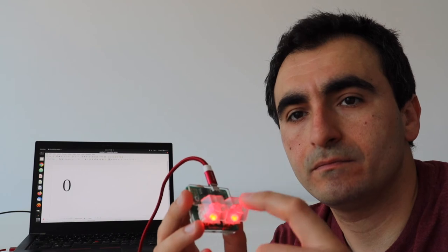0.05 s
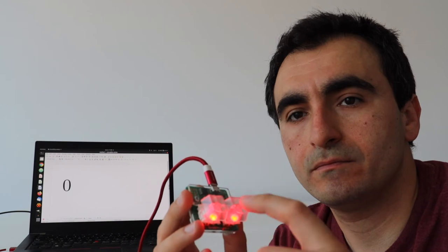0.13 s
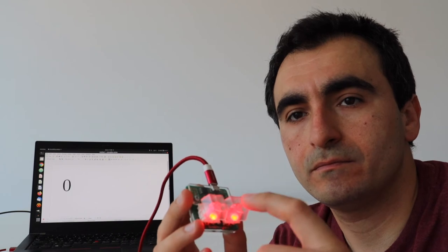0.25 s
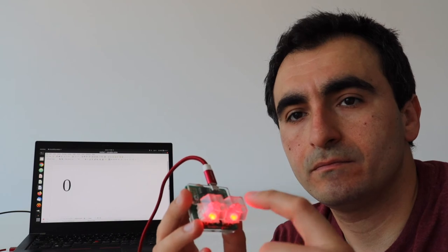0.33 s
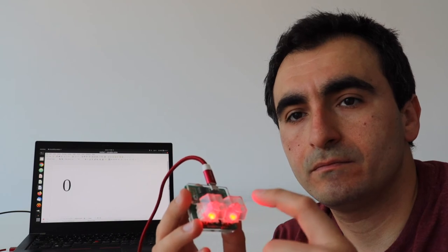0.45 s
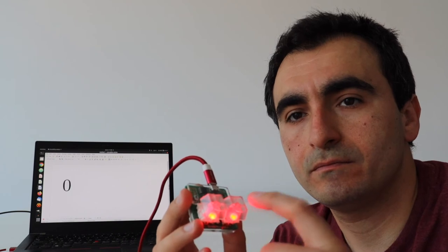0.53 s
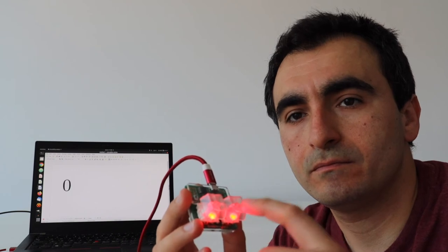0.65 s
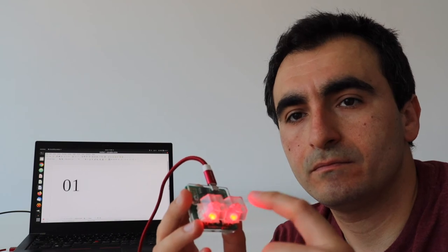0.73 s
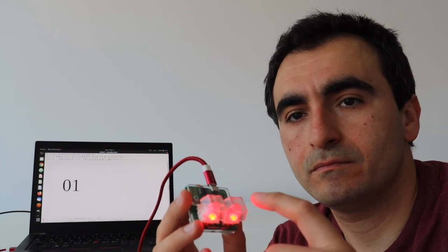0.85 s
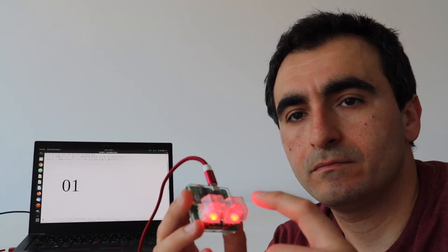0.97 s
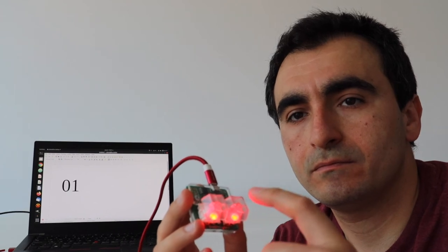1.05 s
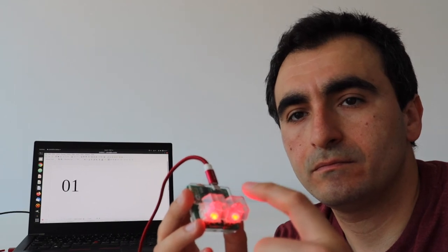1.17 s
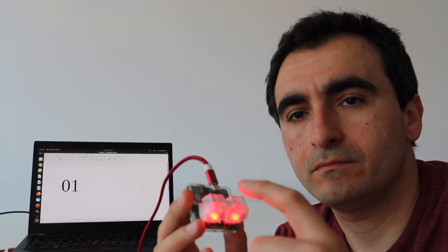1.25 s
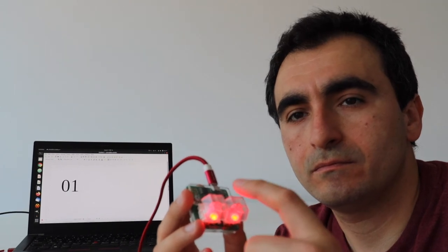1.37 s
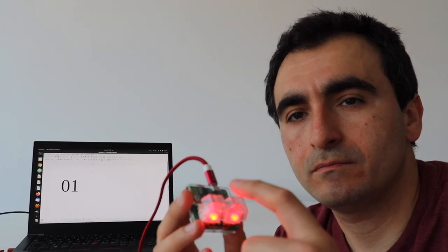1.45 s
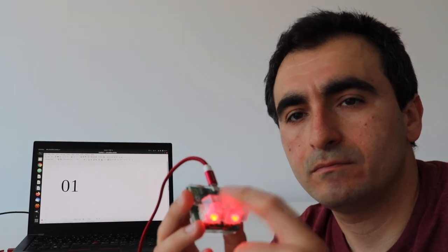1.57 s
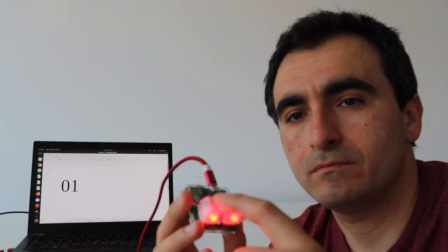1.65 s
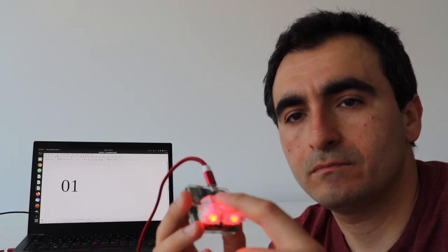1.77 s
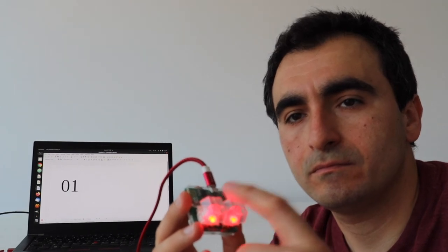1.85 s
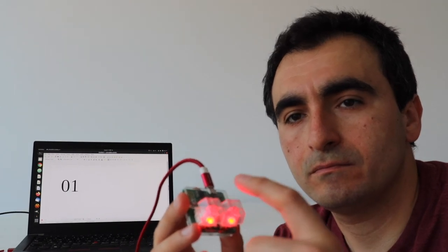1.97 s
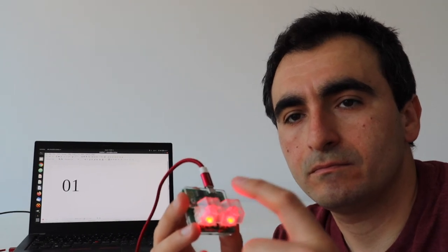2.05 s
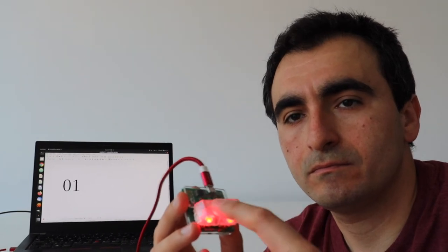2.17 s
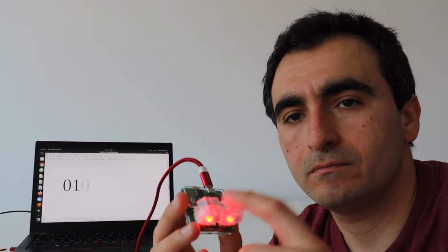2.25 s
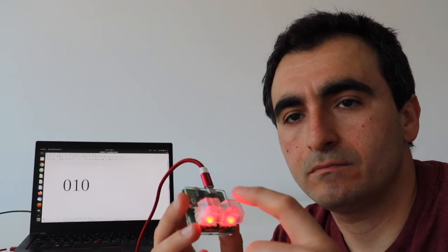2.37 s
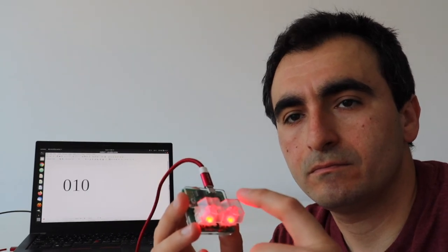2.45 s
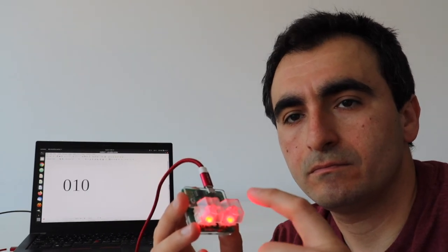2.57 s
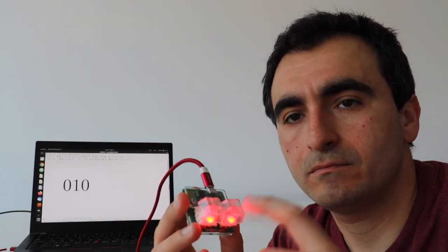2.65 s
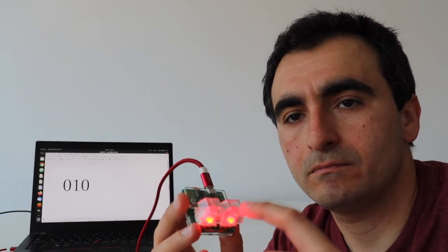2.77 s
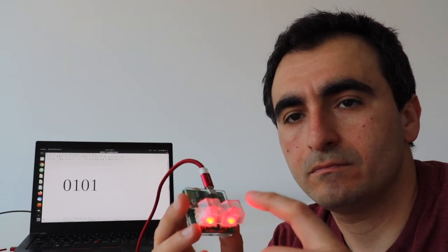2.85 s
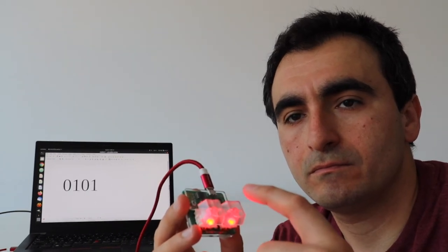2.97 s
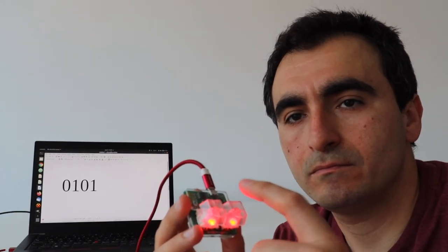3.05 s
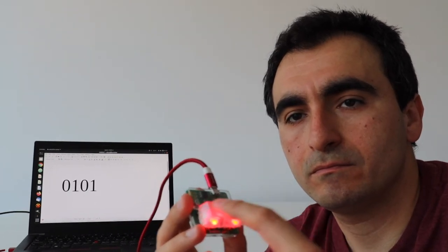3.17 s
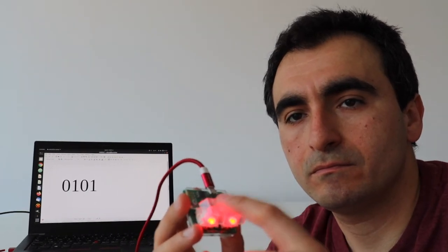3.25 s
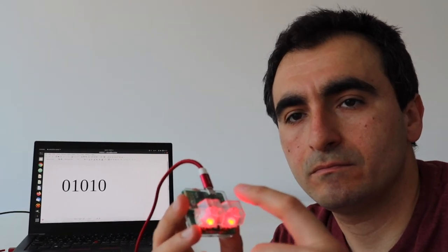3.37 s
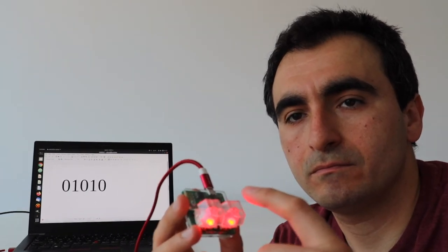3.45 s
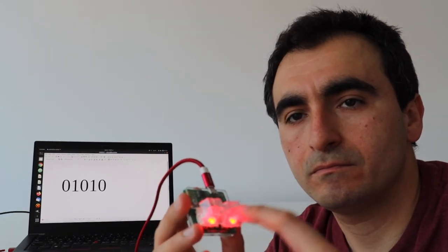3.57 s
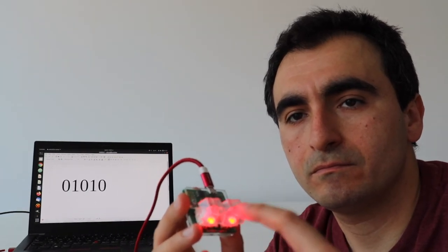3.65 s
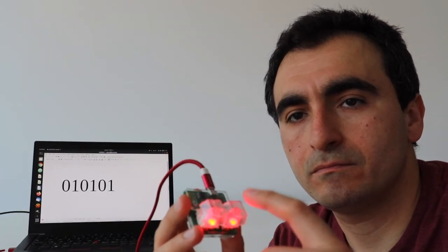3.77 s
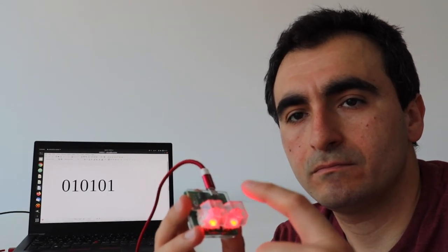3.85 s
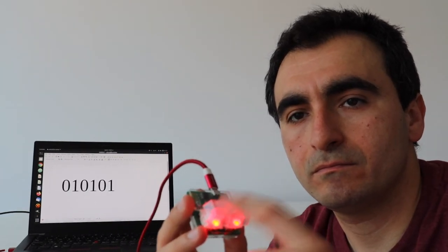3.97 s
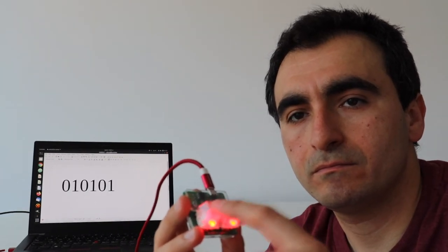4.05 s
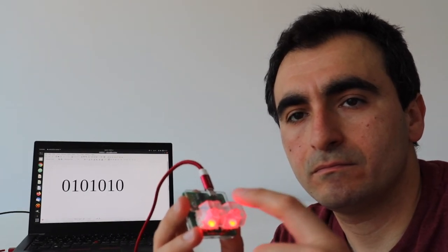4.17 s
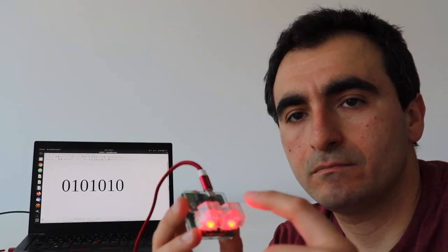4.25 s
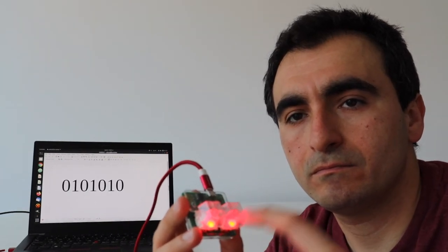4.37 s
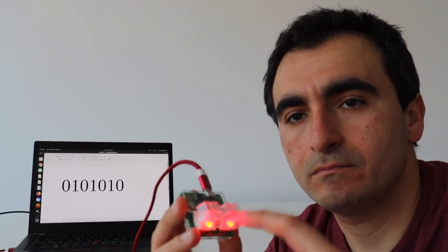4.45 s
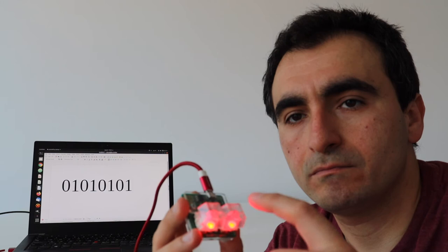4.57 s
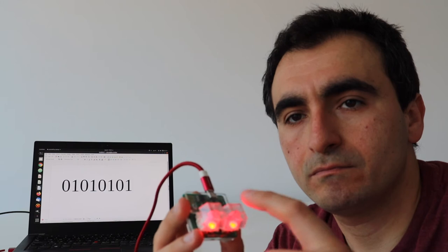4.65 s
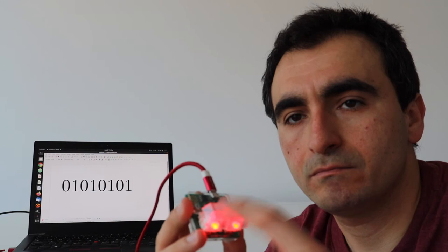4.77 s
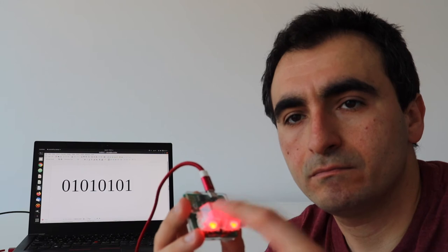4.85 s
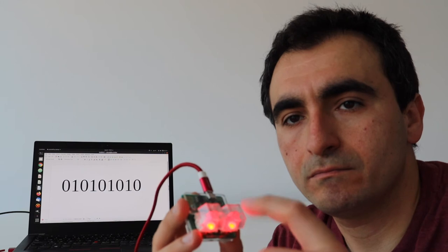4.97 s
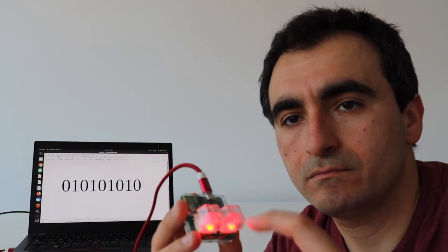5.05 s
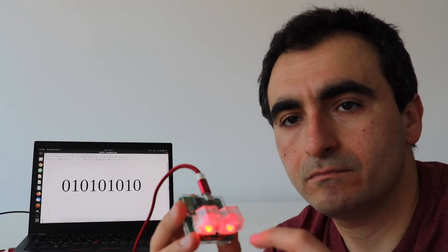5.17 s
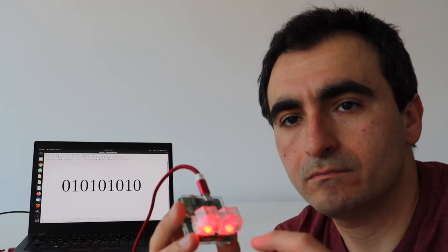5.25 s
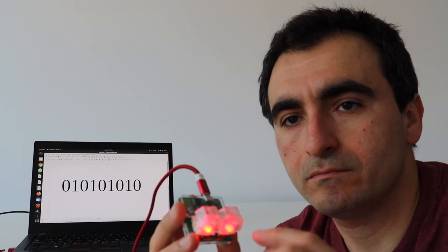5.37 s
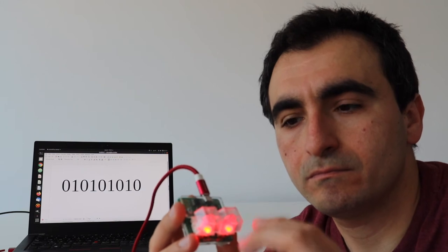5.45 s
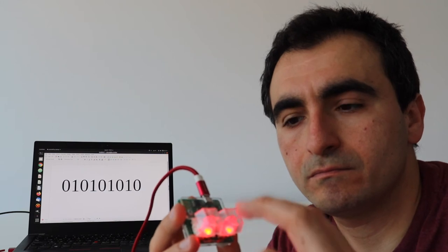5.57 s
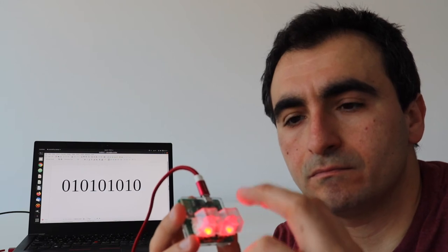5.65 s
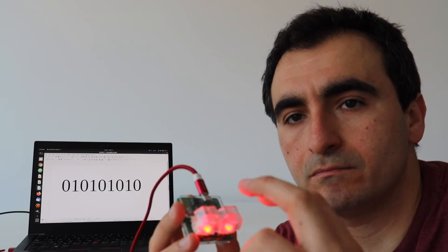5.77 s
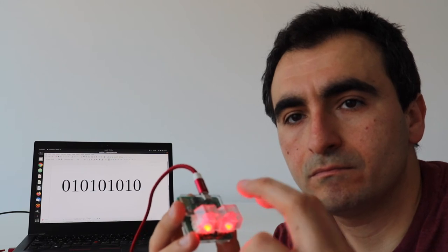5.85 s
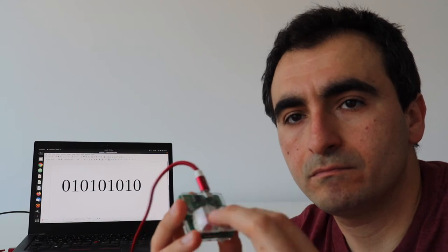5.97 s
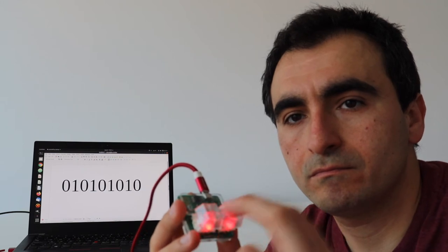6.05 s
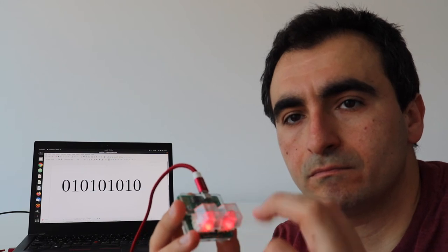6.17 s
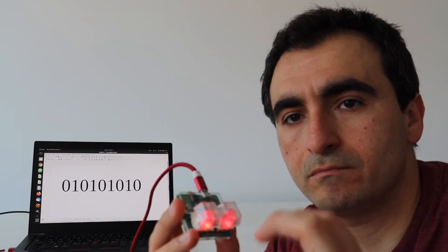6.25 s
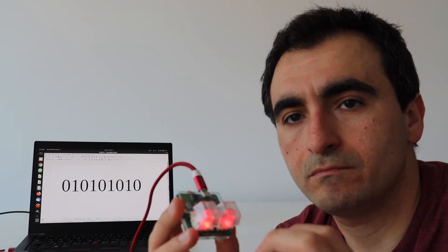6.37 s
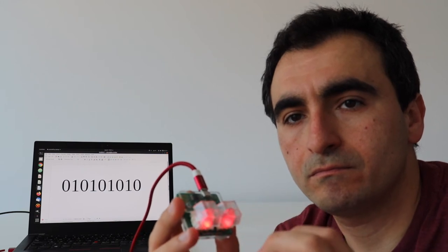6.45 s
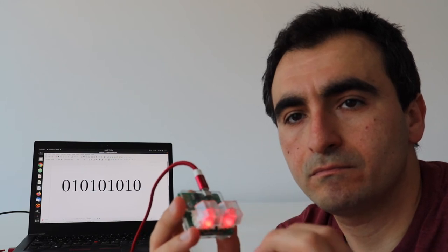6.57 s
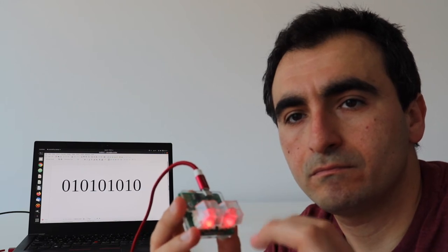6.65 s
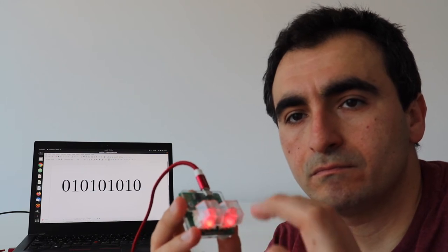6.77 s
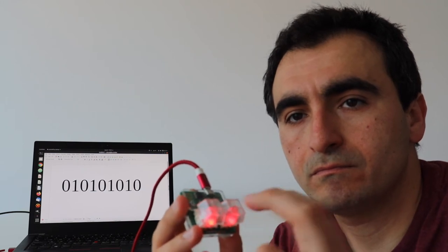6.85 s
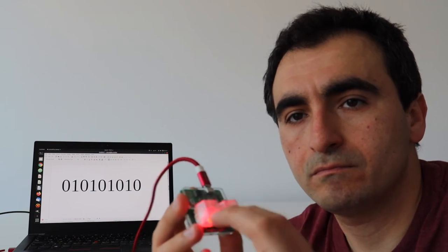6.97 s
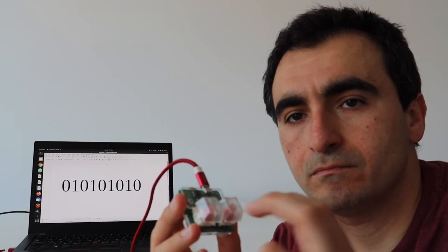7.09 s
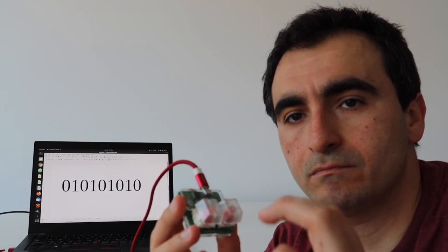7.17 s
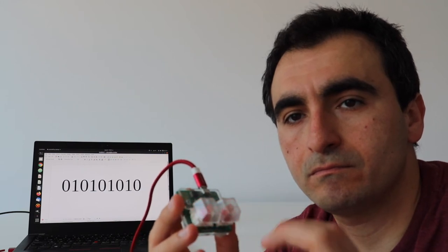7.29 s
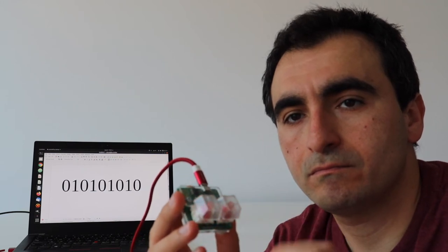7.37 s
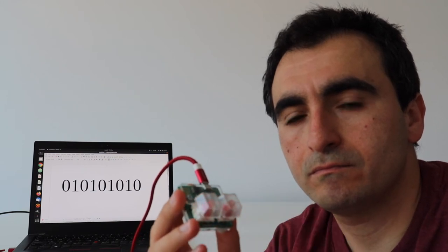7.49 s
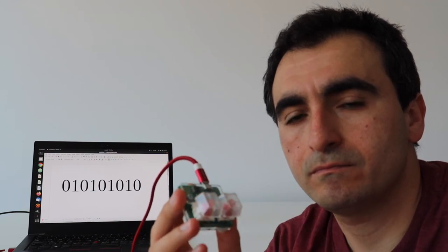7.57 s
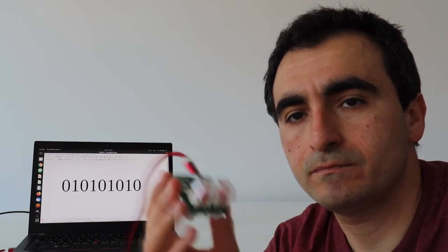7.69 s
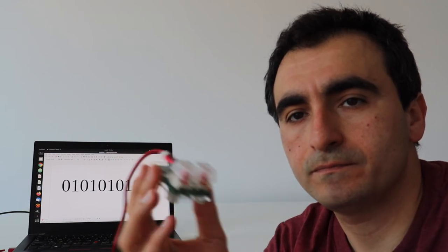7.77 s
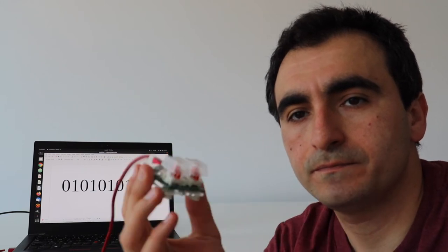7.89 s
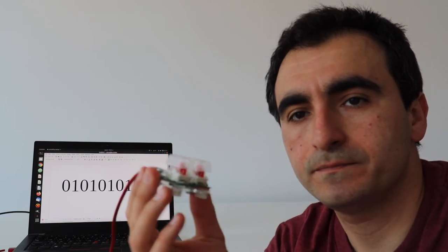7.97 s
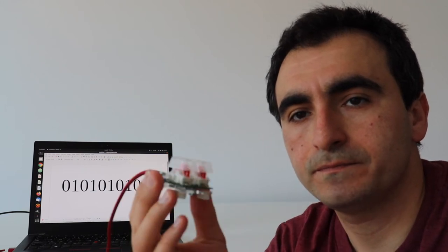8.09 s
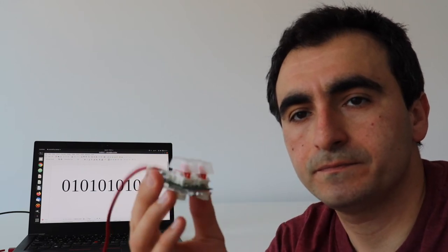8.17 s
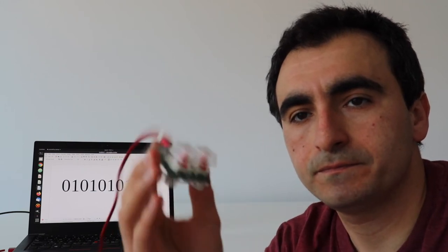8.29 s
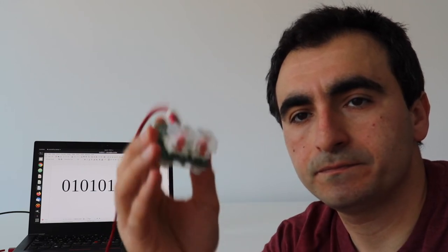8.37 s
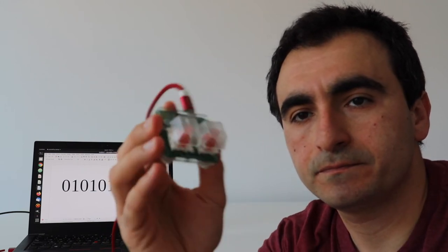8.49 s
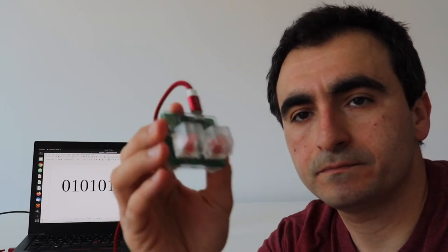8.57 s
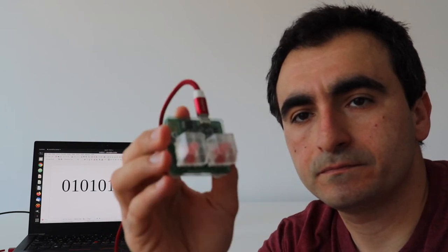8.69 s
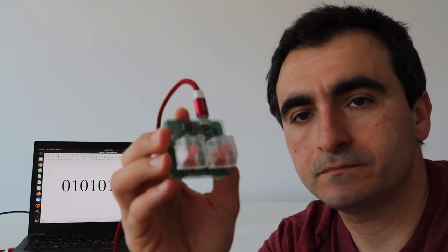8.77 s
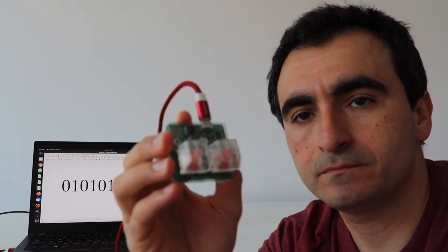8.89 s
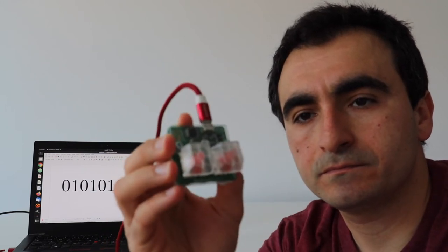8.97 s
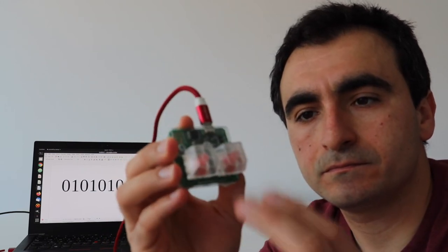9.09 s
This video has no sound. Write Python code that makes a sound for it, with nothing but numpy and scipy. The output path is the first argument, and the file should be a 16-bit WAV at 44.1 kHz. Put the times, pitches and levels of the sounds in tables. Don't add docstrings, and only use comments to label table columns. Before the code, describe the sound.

A finger taps two small mechanical key switches, crisp clacks with a lively room tail, above a faint steady whine and soft hiss.

```python
import sys
import numpy as np
from scipy import signal
from scipy.fft import rfft, irfft
from scipy.io import wavfile

SR = 44100
rng = np.random.default_rng(int(sys.argv[2]) if len(sys.argv) > 2 else 0)


def volts_from_decibels(level):
    exponent = np.asarray(level, float) / 20
    return 10 ** exponent


def store_pcm(level_fs):
    pcm = np.round(np.clip(level_fs, -1, 1) * 32767).astype(np.int16)
    wavfile.write(sys.argv[1], SR, np.atleast_2d(pcm).T)


N = 402633
LEAD = 13230
HZ = np.fft.rfftfreq(2048, 1 / SR)


def keys():
    # start_s, housing_db, board_db, stem_mode_hz, cap_db
    bottom_outs = [(0.669, -9.5, -7.5, 4840, -11), (2.2217, 0.5, -3, 5570, -2.5),
                   (2.7621, -3.5, -5.5, 5130, -10), (3.242, 2.5, -11.5, 4540, -8.5),
                   (3.6562, -2, -4, 5300, -7.5), (4.0636, -2, -4, 5230, -0.5), (4.4643, 0, -7.5, 5220, -8),
                   (4.8674, -5, -4, 5770, -1), (7.0076, 5.5, -10, 4340, -15)]
    # start_s, housing_db, stem_mode_hz, cap_db
    glances = [(4.8684, -19, 5510, 0.5), (6.0224, -2, 4350, -9.5), (6.0261, -3.5, 4330, -6.5),
               (6.0283, -12.5, 5560, 12), (7.0089, -8, 4310, 6), (7.0111, -12.5, 5700, -2.5)]
    # start_s, housing_db, cap_db, board_push_db
    top_outs = [(0.7318, -10, 5, -0.5), (1.7608, -20, 6.5, 0.5), (2.2922, -13.5, 9, 1),
                (2.2936, -14, 10.5, -3), (2.8277, -8.5, 5, 1), (2.8287, -13, -10, -8),
                (3.3132, -10, 4.5, 0.5), (3.3156, -15, 7.5, 0), (3.7296, -6.5, 1.5, -2.5),
                (3.7311, -6, -7, -4), (4.1397, -6.5, 4, -1.5), (4.1412, -36, -2, 3), (4.5362, -4, 3, -3),
                (4.5384, -7, -5.5, -5), (4.9268, -5.5, 7.5, -1.5), (6.0885, -7.5, 6.5, -0.5),
                (6.0899, -17, 9, -0.5), (6.0981, -10, 10.5, 0), (6.0995, -15.5, 10, -3),
                (7.0705, -11.5, 15, 2), (7.0745, -7, 9.5, -1.5)]
    # start_s, housing_db, cap_db
    fidgets = [(0.6463, -25, -9), (1.6653, -32, -6), (1.67, -39.5, 9.5), (2.7515, -25, 0),
               (3.2293, -38.5, 7), (3.2337, -34, 6), (4.1239, -24.5, 9.5), (6.0152, -26, 7),
               (6.0182, -24, 8), (7.6784, -43.5, -2), (7.7457, -36.5, 3), (7.7517, -43, 1),
               (7.8097, -47, -1), (8.2807, -43, 0), (8.2897, -43, 0), (0.6375, -32, -6)]
    # start_s, housing_db, board_db, stem_db, stem_mode_hz, cap_db
    earlier = [(-.19, -9, 3.5, 1.5, 4800, -10), (-.12, -6, -8.5, -1.4, 5500, 4)]
    square_stem_db, askew_stem_db, askew_board_db = 1.7, 10.5, -0.5

    square = [(s, db, board_db, square_stem_db, hz, cap_db)
              for s, db, board_db, hz, cap_db in bottom_outs]
    askew = [(s, db, askew_board_db, askew_stem_db, hz, cap_db) for s, db, hz, cap_db in glances]
    down = knocks(square, rattle_db=-21, rattle_s=.002, tick_db=-2.5, thud_db=-23, free=0.64)
    down += knocks(askew, rattle_db=-17.5, rattle_s=.002, tick_db=-2, thud_db=-16.5, free=0.8)
    up = knocks(loose(top_outs), rattle_db=-15, rattle_s=.0021, tick_db=-14.5, thud_db=-20.5, free=1.0)
    light = landings() + loose(fidgets)
    touch = knocks(light, rattle_db=-11, rattle_s=.0015, tick_db=-5, thud_db=-18.5, free=.9)
    before = knocks(earlier, rattle_db=-42, rattle_s=0.0018, tick_db=-16, thud_db=-18, free=0.55)
    return volts_from_decibels(0.44) * (down + up) + volts_from_decibels(2.0) * touch + before


def loose(rows):
    knock_rows = []
    for s, db, cap_db, *push_db in rows:
        board_db = -3.5 + 0.28 * cap_db + sum(push_db)
        stem_db = -4 + 0.44 * cap_db
        knock_rows.append((s, db, board_db, stem_db, 5720, cap_db))
    return knock_rows


def landings():
    # start_s, housing_db, graze_db, settle_db
    touches = [(0.6419, -26, -22, -16), (2.216, -18, -6, -11), (2.7461, -23, -6, -0.5),
               (3.6407, -26, -4, -1), (4.0548, -19.5, -16, -7), (4.451, -23, -8, -6),
               (4.8558, -21, -16, -4), (7.0008, -19, -7, -5)]
    # board_db, stem_db, stem_mode_hz, cap_db
    graze, contact, settle = [
        (-1, -5.5, 4350, 0.5),
        (7, 5, 12000, 3),
        (1, 4, 5600, 4),
    ]
    graze_s, settle_s = .0026, .0019
    knock_rows = []
    for s, db, graze_db, settle_db in touches:
        knock_rows.append((s - graze_s, db + graze_db, *graze))
        knock_rows.append((s, db, *contact))
        knock_rows.append((s + settle_s, db + settle_db, *settle))
    return knock_rows


def knocks(rows, rattle_db, rattle_s, tick_db, thud_db, free):
    # mode_hz, level_db, t60_s
    housing = [(3150, -8, .008), (3430, -0.5, 0.016), (3790, -5.5, .008)]
    board = [(1750, -13, .014), (2237, -4, 0.012), (2595, 0.5, 0.01), (2930, -2, 0.0046)]
    stem = [(4210, -2.5, .011), (4480, -3, 0.0087), (4800, -3.5, 0.0074), (5170, -5.5, .008),
            (5590, -2, .016), (6170, -9.5, .007)]
    left_cap = [(6800, -12, .007), (7350, -6.5, .011), (7626, -1.5, .02), (8400, -13, .01),
                (9200, -17.5, .007)]
    right_cap = [(6500, -4.5, 0.0063), (7000, -5, 0.0087), (7450, -2.5, .012), (8000, -5, .01),
                 (8600, -1.5, .016)]
    tick = [(9900, -6.5, .004), (11080, -3, .006), (12000, 0, .007), (12700, -0.5, .005),
            (13620, -3.5, .005), (14800, -4, 0.0048), (16000, -9, 0.0033)]
    jolt = [(449, -4.5, .003), (1000, 0, 0.0053), (1280, 1, .006)]
    right_strokes = [.7, 2.79, 3.69, 4.49, 8.28]
    stroke_reach_s = .08

    out = np.zeros(LEAD + N + 2000)
    t = np.arange(260) / SR
    chances = rng.standard_normal((len(rows), 320))
    for (s, db, board_db, stem_db, stem_hz, cap_db), luck in zip(rows, chances):
        blow = volts_from_decibels(rattle_db) * luck[60:] * np.exp(-(t / rattle_s) ** 2)
        blow[0] = -1
        is_right = min(abs(s - np.array(right_strokes))) < stroke_reach_s
        cap = right_cap if is_right else left_cap
        power = ring(housing, 0, luck, free)
        power += ring(board, board_db, luck[10:], free)
        power += ring(stem + [(stem_hz, 3, .015)], stem_db, luck[20:], free)
        power += ring(cap, cap_db, luck[30:], free)
        power += ring(tick, cap_db + tick_db, luck[40:], free)
        power += ring(jolt, thud_db, luck[50:], 0.89)
        power_heard = power / (abs(rfft(blow, 2048)) + .2) ** 1.3
        sound = np.convolve(blow, causal(power_heard))
        at = LEAD + round(s * SR) + 6
        out[at:at + len(sound)] += volts_from_decibels(db) * np.sqrt(power.sum()) * sound / np.linalg.norm(sound)
    return out


def ring(modes, db, luck, free):
    hz, mode_db, t60 = np.transpose(modes)[:, :, None]
    luck = luck[:len(modes), None]
    load = volts_from_decibels(mode_db + 2.5 * luck)
    detuned_hz = hz * (1 + .008 * luck[::-1])
    off = (HZ - detuned_hz) * free * t60 / 1.1
    power = (load ** 2 / (1 + off ** 2)).sum(0)
    power /= 1 + (.9 * hz.min() / (HZ + 1)) ** 10 + (HZ / (1.08 * hz.max())) ** 14
    return volts_from_decibels(db) ** 2 * power / power.sum()


def causal(power):
    cepstrum = irfft(.5 * np.log(power + 1e-12 * power.max()))
    cepstrum[1:1024] *= 2
    cepstrum[1025:] = 0
    return irfft(np.exp(rfft(cepstrum)))[:1200]


def room(x):
    # delay_s, level_db
    echoes = [(.004, -20), (.008, -25), (.0217, -27), (.0257, -27), (.0282, -28), (.0322, -29)]
    # time_s, level_db
    facing = [(.7, 0), (1.7, 2), (2.25, 1.4), (2.799, -0.5), (3.28, 2), (3.7, -0.5), (4.1, 0.9),
              (4.5, -0.1), (4.9, 0.8), (6.05, 1.45), (7.04, 1)]
    # band_hz, t60_s
    tail_t60 = [(1000, .9), (2600, 1.2), (5000, 1.12), (7600, 1.0), (10000, .8), (12500, .65), (16000, .5)]
    # band_hz, level_db
    tail_energy = [(1000, -9.5), (1800, -7), (2500, -10.5), (3500, -10.5), (5000, -11), (7600, -14),
                   (10000, -12.5), (13000, -19.5), (16000, -16)]

    out = x.copy()
    t_out = np.arange(len(x)) / SR
    outward = x * volts_from_decibels(np.interp((np.arange(len(x)) - LEAD) / SR, *np.transpose(facing)))
    for s, db in echoes:
        delay = round(s * SR)
        out[delay:] += volts_from_decibels(db) * x[:-delay]
    for k in range(3):
        hz, t, z = signal.stft(rng.standard_normal(int(1.5 * SR)), SR, nperseg=256)
        onset = np.clip((t - .006) / 0.0062, 0, 1)
        decay = volts_from_decibels(-60 * t / read(tail_t60, hz)[:, None]) * onset
        decay *= volts_from_decibels(read(tail_energy, hz))[:, None] / np.sqrt((decay ** 2).sum(1, keepdims=True) * 128)
        tail = signal.istft(z * decay, SR, nperseg=256)[1]
        share = np.sqrt(2 / 3) * np.cos(np.pi * (t_out * 160 + k / 3))
        out += signal.fftconvolve(outward * share, tail)[:len(x)]
    return out[LEAD:LEAD + N]


def fan():
    # time_s, pitch_hz, level_db
    whine = [(0.0, 887.6, -61), (1.4, 889.5, -60), (1.63, 889.6, -57.5), (3.99, 889.1, -58.5),
             (4.65, 889.4, -63), (5.92, 890.6, -55), (6.18, 889.7, -66), (6.31, 889.0, -55.5),
             (6.79, 888.3, -64), (8.11, 886.9, -60), (8.14, 888.1, -69.5), (9.13, 886.5, -63.5)]
    # pitch_hz, width_hz, level_db
    hum_modes = [(178, 14, -75), (781, 8, -72.5), (843, 12, -70), (912.7, 8, -71), (960, 14, -78)]
    pitch = curve(whine, 1)
    line = np.sqrt(2) * np.cos(2 * np.pi * np.cumsum(pitch) / SR)
    fuzz = evened(resonate(rng.standard_normal(N), pitch, 5.2))
    hums = sum(volts_from_decibels(db) * evened(resonate(rng.standard_normal(N), hz, w)) for hz, w, db in hum_modes)
    return volts_from_decibels(curve(whine, 2)) * (0.84 * line + 0.55 * fuzz) + hums


def rumble():
    # mode_hz, width_hz, level_db
    low_modes = [(37.8, 11, -3), (50.6, 4.2, 5.5), (75, 25, 5), (90.4, 6.4, -8), (118.5, 2.7, -8)]
    # time_s, level_db
    traffic = [(0.0, -47.5), (0.07, -60.5), (1.14, -53.5), (2.26, -59.5), (2.54, -55.5), (2.97, -65),
               (3.51, -60.5), (3.61, -57.5), (4.22, -60.5), (4.47, -53.5), (5.77, -60), (5.8, -57),
               (6.05, -66), (6.89, -55.5), (7.02, -61.5), (8.57, -57), (8.8, -54), (9.13, -57.5)]
    low = np.zeros(N)
    for hz, width, db in low_modes:
        narrow = resonate(rng.standard_normal(N), hz, width)
        low += volts_from_decibels(db) * evened(resonate(narrow, hz, 2 * width))
    drone = evened(resonate(rng.standard_normal(N), 156, 13))
    return volts_from_decibels(curve(traffic, 1)) * (volts_from_decibels(-3.5) * evened(low) + volts_from_decibels(-4) * drone)


def scrape():
    # start_s, hold_s, level_db
    drags = [(2.06, 0.18, -56), (3.31, .03, -58), (5.27, 0.14, -69.5)]
    # mode_hz, width_hz, level_db
    floor_modes = [(282.4, 33, 10), (356.2, 6.6, 9), (452, 13, 8), (583.4, 28, 5.5), (636, 20, 5)]
    rise_s, fade_db_per_s = .05, 55
    rough = rng.standard_normal(N)
    tone = evened(sum(volts_from_decibels(db) * evened(resonate(rough, hz, w)) for hz, w, db in floor_modes))
    t = np.arange(N) / SR
    level = np.zeros(N)
    for s, hold, db in drags:
        rise = np.clip((t - s) / rise_s, 0, 1)
        fading_s = np.maximum(t - s - rise_s - hold, 0)
        level += rise * volts_from_decibels(db - fade_db_per_s * fading_s)
    return tone * level


def hiss():
    # band_hz, level_db (per Hz)
    noise_floor = [(65, -37.5), (110, -17.5), (164, -2.5), (244, -6.5), (682, -12), (877, -6.5),
                   (1150, -14.5), (1390, -14), (1580, -17.5), (2960, -21.5), (3800, -22.5), (15200, -27),
                   (16500, -28)]
    hz = np.fft.rfftfreq(N, 1 / SR)
    z = rfft(rng.standard_normal(N)) * volts_from_decibels(read(noise_floor, hz))
    return volts_from_decibels(-63.5) * irfft(z, N) / np.std(irfft(z * (hz > 1200), N))


def evened(x):
    return x / np.sqrt(np.mean(x ** 2) + 1e-20)


def read(points, hz):
    f, value = np.transpose(points)
    return np.interp(np.log(hz + 1), np.log(f + 1), value)


def curve(rows, column):
    rows = np.array(rows)
    return np.interp(np.arange(N) / SR, rows[:, 0], rows[:, column])


def resonate(x, hz, width):
    turn = np.exp(2j * np.pi * np.cumsum(hz * np.ones(len(x))) / SR)
    r = np.exp(-np.pi * width / SR)
    return 2 * (turn * signal.lfilter([1 - r], [1, -r], x / turn)).real


def scene():
    mono = room(keys()) + hiss() + fan() + rumble() + scrape()
    return np.array([mono, mono])


def roll_off(x):
    return signal.sosfilt(signal.butter(12, 16970, fs=SR, output="sos"), x)


def record(dry):
    unequal = volts_from_decibels(-82) * rng.standard_normal(N)
    unequal += volts_from_decibels(-79) * evened(resonate(rng.standard_normal(N), 60, 200))
    unequal += volts_from_decibels(-40) * np.diff(dry[0], 2, prepend=[0, 0])
    rounded = .85 * np.tanh(dry / .85)
    pair = rounded + unequal * np.array([[1], [-1]])
    band_limit = signal.firwin(127, 16300, window=("kaiser", 8), fs=SR)
    pair = signal.oaconvolve(pair, band_limit[None], "same")
    return roll_off(pair)


dry = scene()
out = record(dry)
store_pcm(out)
```